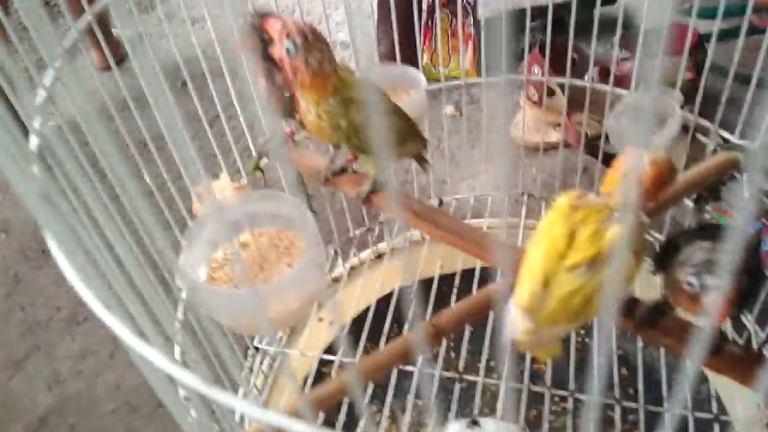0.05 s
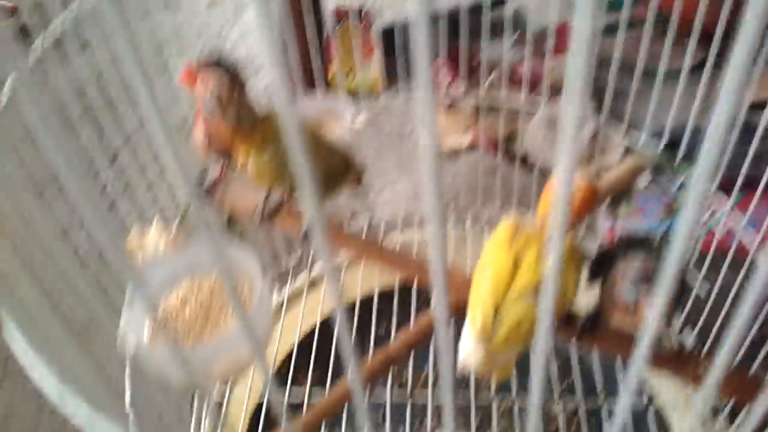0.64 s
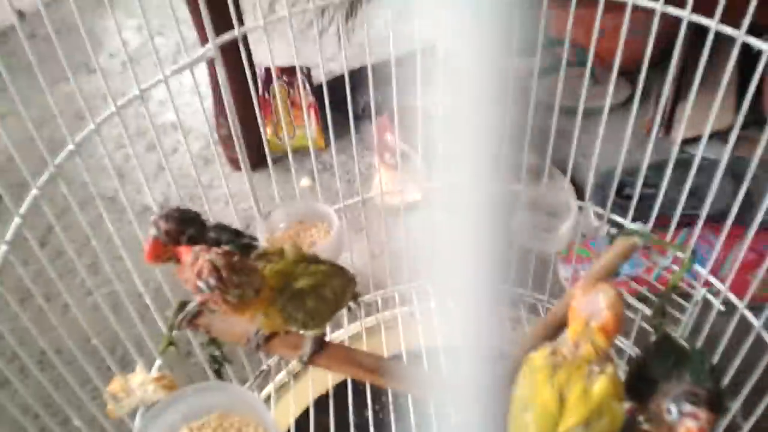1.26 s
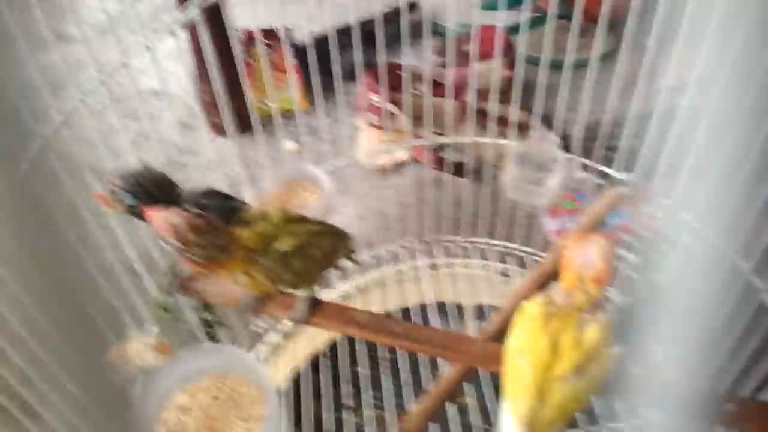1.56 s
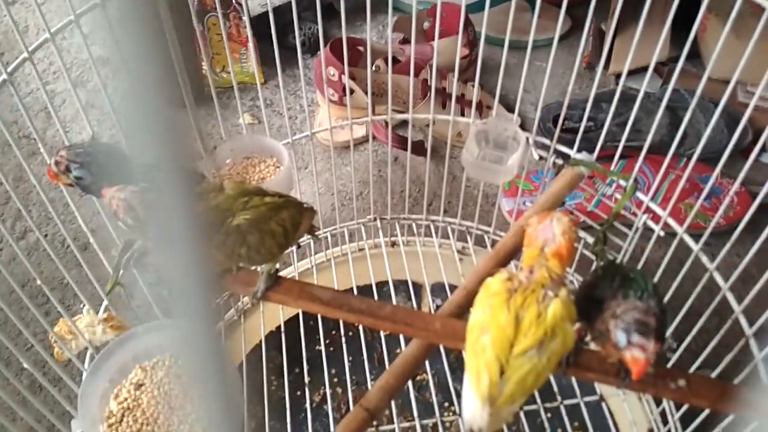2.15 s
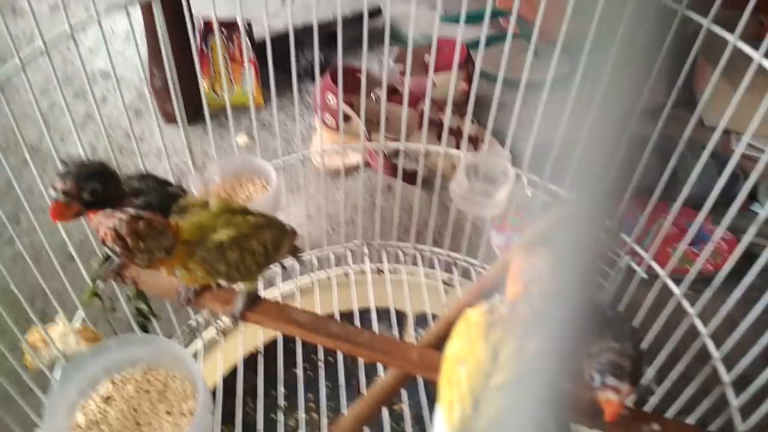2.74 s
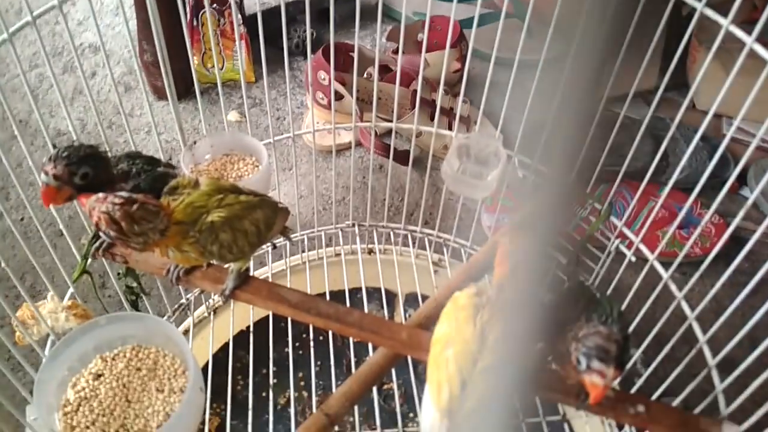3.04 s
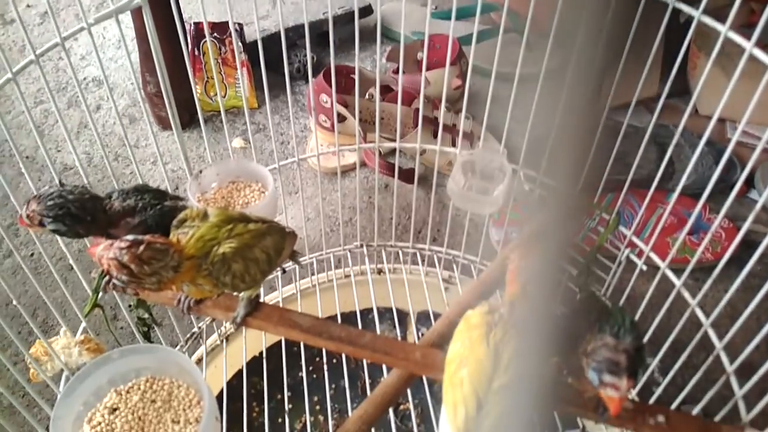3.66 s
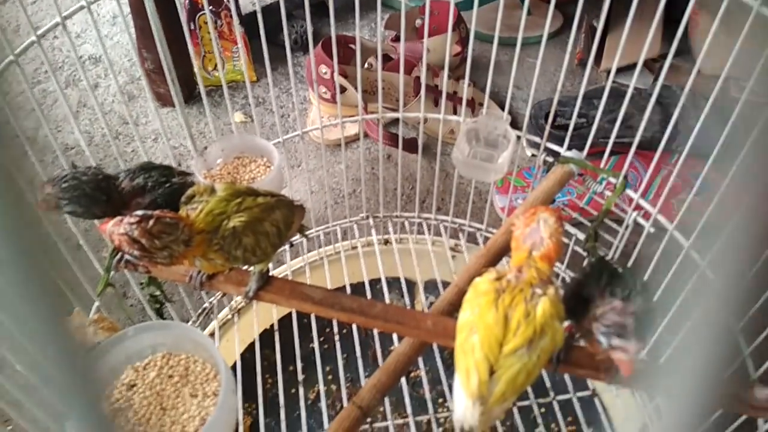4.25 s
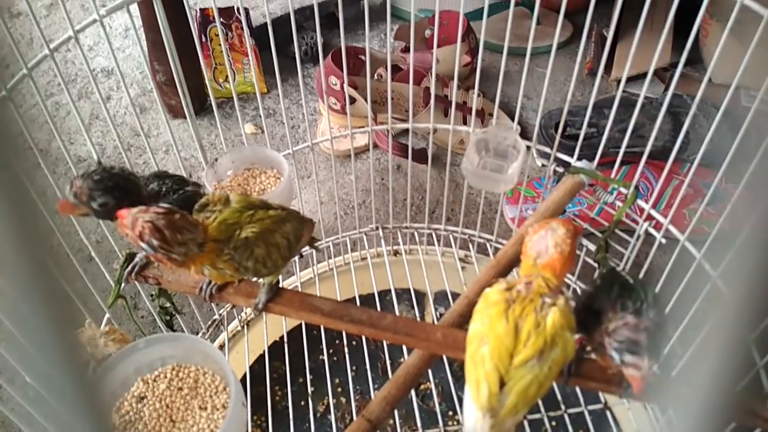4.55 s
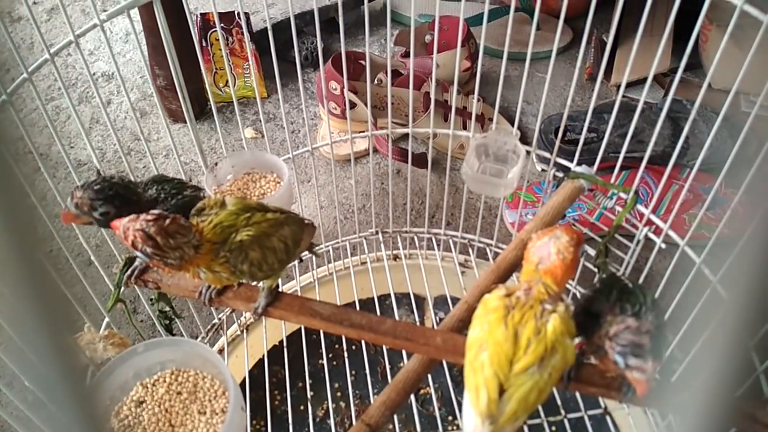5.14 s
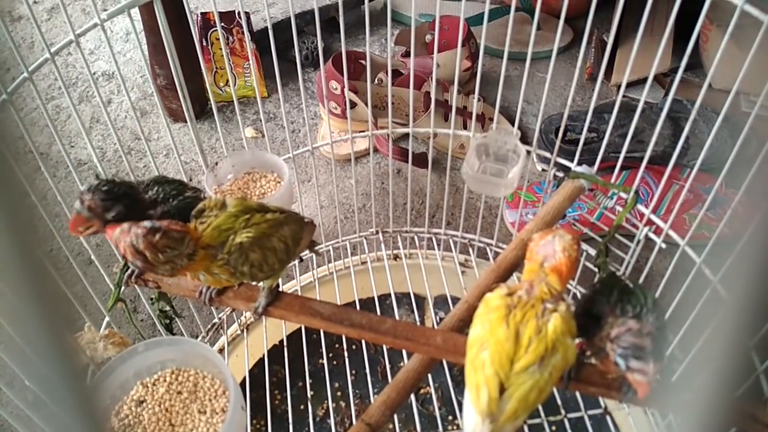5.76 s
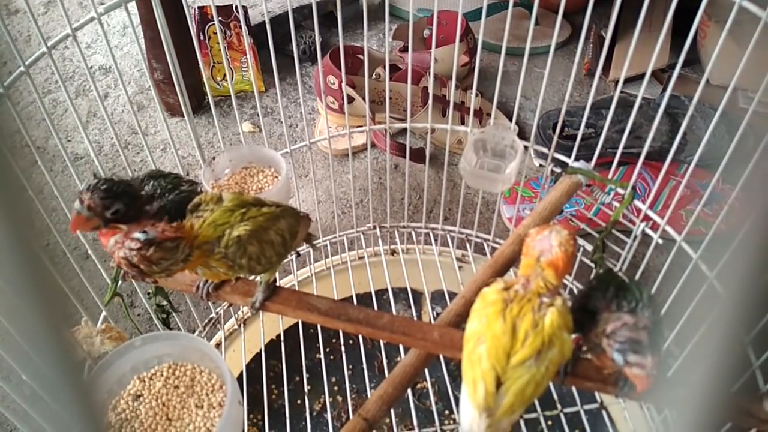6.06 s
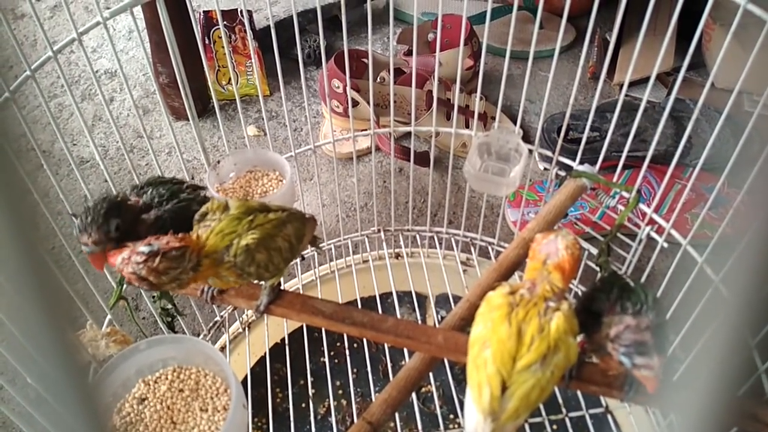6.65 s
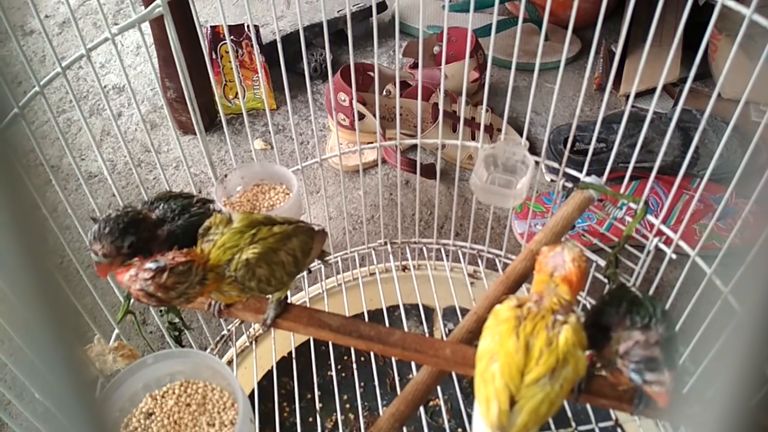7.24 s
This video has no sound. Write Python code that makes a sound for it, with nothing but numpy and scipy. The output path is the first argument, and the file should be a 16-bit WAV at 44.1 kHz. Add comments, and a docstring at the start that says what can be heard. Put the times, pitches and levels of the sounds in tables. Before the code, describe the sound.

Close, hand-held stereo sound of chicks begging indoors: harsh little buzzing rasps with squeaky chirps and breathy hisses slipped between them. Early on the calls turn to dry chuffs, then feathers flutter softly and the cage takes one knock. The rasping resumes in clusters with brief pauses and keeps on to the end, with an occasional tick on the wires. Underneath lie very faint distant bird calls and a low motor hum.

```python
"""Hoarse begging rasps, close up: lovebird chicks in a wire cage in a small room, in hand-held stereo.
Each rasp is a run of sharp syrinx clicks that speeds up into a buzz and rings in throat and beak.
Dry chuffs, thin hisses, gliding chirps and soft mutters slip in between the rasps.
The cage ticks and is bumped, feathers rustle, other birds call far off, and a motor throbs faintly."""
import sys
import numpy as np
from scipy import signal
from scipy.fft import rfft, irfft, next_fast_len
from scipy.io import wavfile
from scipy.ndimage import map_coordinates

SR = 44100
rng = np.random.default_rng(int(sys.argv[2]) if len(sys.argv) > 2 else 0)


def file_out(sig):
    """Save sig as 16-bit WAV at sys.argv[1]."""
    # one column per channel
    cols = np.atleast_2d(sig).T
    # limit, then scale
    lim = np.clip(cols, -1, 1)
    pcm = np.round(lim * 32767).astype(np.int16)
    wavfile.write(sys.argv[1], SR, pcm)


N = 330750
T = np.arange(N) / SR

# begging rasps: (start [s], end [s], level [dB], swell from first to second half [dB],
# buzz [Hz], throat [Hz], throat boost [dB], beak [Hz])
RASPS = [(0.075, 0.227, -36, 3, 971, 5370, 11.5, 9900), (0.292, 0.427, -36.5, -2.5, 920, 5120, 11, 9860),
         (1.353, 1.412, -30, -0.5, 906, 5310, 13, 9210), (1.417, 1.514, -39.5, -1.5, 948, 5020, 4, 10950),
         (1.499, 1.615, -32.5, 1, 885, 4800, 10, 7860), (1.687, 1.806, -33, -1, 894.6, 4500, 4, 9240),
         (2.325, 2.493, -34, 2.5, 905, 4340, 7.5, 9500), (2.551, 2.678, -32.5, -2.5, 890, 4630, 7.5, 9830),
         (2.688, 2.768, -42, 0.5, 827, 5340, -10.5, 10200.0),
         (2.748, 2.863, -30.5, -1.5, 919, 4900, 6, 10080), (3.288, 3.366, -33.5, -2.5, 947, 4920, 8, 8110),
         (3.377, 3.459, -40.5, 1.5, 908, 5240, 3, 10600), (3.453, 3.499, -31, -2, 920, 4900, -5.5, 10440),
         (3.632, 3.766, -38, -0.5, 931, 5500, -2, 10900), (4.452, 4.584, -33, 2, 915, 5430, 1.5, 9700),
         (4.655, 4.708, -32.5, -1, 873, 5460, 5.5, 10840), (4.715, 4.855, -34.5, 0, 942, 5730, 6, 10700),
         (5.473, 5.609, -31, -1, 965, 5500, 7.5, 9820), (5.636, 5.697, -43, -8, 865, 4540.0, 4.5, 10200),
         (5.688, 5.727, -31, 0.5, 934, 5330, 9.5, 10200),
         (5.735, 5.874, -31.5, 3.5, 999, 5760, 15.5, 10100),
         (5.927, 5.984, -32.5, -0.5, 875, 5250, 1.5, 10370),
         (6.106, 6.22, -35.5, 3, 856, 5020.0, 1.5, 10700),
         (6.247, 6.425, -31.5, 2.5, 903.5, 5760, 8.5, 11050),
         (6.488, 6.629, -30.5, 0, 909, 5510, 7.5, 9900), (6.703, 6.737, -33, 4.5, 1050, 5350, 4.5, 8960),
         (6.774, 6.869, -32.5, -1.5, 877, 5400, 7.5, 9300),
         (7.387, 7.503, -31.5, 2.5, 889, 5570, 8.5, 9540)]
# short dry chuffs, all slow clicks: (start [s], end [s], level [dB])
CHUFFS = [(.508, .545, -37), (.6, .637, -36.5), (.696, .73, -39), (.79, .836, -48), (.92, .95, -36.5),
          (.99, 1.04, -49), (1.088, 1.127, -30), (1.162, 1.206, -31), (1.281, 1.337, -32.5),
          (1.928, 1.963, -41.5), (2.222, 2.33, -51.5), (3.231, 3.29, -47), (4.428, 4.455, -47.5),
          (4.921, 4.979, -39), (5.402, 5.426, -38)]
# thin, almost voiceless hisses: (start [s], end [s], level [dB])
HISSES = [(.05, .12, -38), (.38, .518, -41.5), (1.21, 1.27, -46), (3.55, 3.636, -44), (3.77, 3.9, -43.5),
          (4.85, 5.015, -45), (5.127, 5.25, -56), (5.988, 6.036, -42), (7.323, 7.396, -40)]
# the voice of chuffs and hisses: (buzz [Hz], throat [Hz], throat boost [dB], beak [Hz])
SOFT_VOICE = (660, 7300, 0.93, 11500)
# the character of each kind of call:
# (chest boost [dB], beak boost [dB], beak width [Hz], attack [s], breath [dB], slow clicking [s])
RASP_SHAPE = (0.5, 4.2, 1700, .015, -4.3, .022)
CHUFF_SHAPE = (0.5, 9, 2600, .02, -4.5, .15)
HISS_SHAPE = (-12.5, 9, 2200, .05, 3, .005)
# a chick's tone colour before its resonances: (frequency [Hz], level [dB])
VOICE_COLOUR = [(300, -38.5), (560, -15), (880, -4), (1300, -5), (1850, -2.5), (3150, -1.5), (3800, -3.5),
                (5200, 0.5), (6600, -3.5), (7700, 1), (9000, -3.5), (11800, -2.5), (13200, -6),
                (15500, -19)]
# the two low resonances of a slack throat: (lower [Hz], upper [Hz])
CLUCK_HZ = [1370, 2300]
# clear chirps: (start [s], end [s], first pitch [Hz], middle pitch [Hz], last pitch [Hz],
# level [dB], brightness [dB per harmonic])
CHIRPS = [(.105, .229, 2560, 2830, 2720, -39, -2), (.545, .575, 3550, 3400, 2800, -45, -1),
          (1.238, 1.288, 3950, 3450, 3900, -44, 0), (1.238, 1.29, 3400, 2950, 3400, -46, -4),
          (2.505, 2.527, 3150, 3600, 3750, -45, 2), (2.527, 2.572, 3680, 3600, 3950, -39, 1),
          (3.325, 3.355, 3620, 3700, 3750, -37, 1), (3.507, 3.545, 3790, 4060, 4100, -34, -2),
          (3.762, 3.79, 3700, 3600, 3500, -42, 3), (3.785, 3.821, 3450, 3800, 3750, -38.5, 3),
          (3.865, 3.913, 4060, 4336, 3550, -43, 5), (4.593, 4.636, 3780, 4150, 4300, -34.5, -4),
          (4.777, 4.797, 4250, 4200, 3950, -39, 4), (4.853, 4.882, 3200, 3350, 4000, -39.5, -1),
          (4.884, 4.921, 3650, 3400, 4150, -40, 3), (4.975, 5.021, 4400, 4300, 3650, -40, 5),
          (5.426, 5.469, 2850, 2400, 2750, -34.5, -0.5), (5.612, 5.649, 3350, 3700, 4450, -36, -1),
          (5.872, 5.901, 4150, 4370, 4550, -32, -6), (6.227, 6.251, 4140, 3950, 3450, -41, 5),
          (6.417, 6.469, 4025, 3670, 2605, -40.5, 3), (6.626, 6.648, 4080, 4180, 4100, -35.5, -1),
          (7.419, 7.449, 4280, 4040, 3550, -42, 2)]
# harmonics 1-5 of a chirp: (level [dB])
CHIRP_HARMONICS = [-2, -0.5, -3, -3.5, -17]
# soft wavering mutters: (start [s], end [s], level [dB])
MUTTERS = [(0, 0.043, -45.5), (1, 1.102, -59), (1.167, 1.234, -42.5), (1.283, 1.331, -38.5),
           (2.236, 2.32, -54.5), (3.544, 3.63, -51.5), (7.298, 7.345, -52)]
# hits on the cage: (time [s], wire tick [dB], tray knock [dB])
CAGE_HITS = [(0.932, -38, -80), (0.944, -44, -53.5), (1.333, -26, -32), (1.3459, -24.5, -39),
             (1.352, -26, -52.5), (1.932, -41.5, -52.5), (1.947, -33, -53.5), (3.0312, -48, -33.5),
             (3.461, -36.5, -79.5), (6.098, -43.5, -80), (7.289, -40, -63)]
# the colour of a wire tick: (frequency [Hz], level [dB])
WIRE_COLOUR = [(400, -23), (1500, -3.5), (4000, -16), (7000, -9), (11500, -4.5), (15500, -12)]
# modes of the plastic tray: (frequency [Hz], level [dB], t60 [s])
TRAY_MODES = [(233, -13, 0.098), (340, -5, 0.033), (470, 6.5, 0.0055), (935, -10, 0.0033),
              (1460, -11, .015), (2230, -6.5, 0.027)]
# the hand jolts against the bars: (time [s], level [dB])
BUMP_ENVELOPE = [(1.325, -69.5), (1.338, -37), (1.375, -39.5), (1.40, -47), (1.45, -73)]
# a chick flutters and shuffles on the perch: (start [s], end [s], level [dB])
RUSTLES = [(0.957, 1.616, -49), (1.94, 2.024, -49)]
# the colour of brushing feathers: (frequency [Hz], level [dB])
FEATHER_COLOUR = [(400, -16), (1500, -13.5), (5000, -7), (11000, -1.5), (15500, 0)]
# distant birds: (start [s], end [s], first pitch [Hz], middle pitch [Hz], last pitch [Hz],
# fundamental [dB], second harmonic [dB])
FAR_CALLS = [(3.983, 4.13, 737, 871, 874, -67, -71), (4.282, 4.486, 777, 764, 773, -65.5, -66),
             (4.963, 5.417, 1535, 1480, 1376, -75, -101), (7.099, 7.125, 4120, 5090, 5320, -49.5, -60.5)]
# the still room: (frequency [Hz], level [dB])
ROOM_TONE = [(25, -6.5), (70, -2.5), (190, -5), (330, -22), (1000, -34), (3400, -41.5), (7000, -35.5),
             (10000, -31), (13000, -39.5), (15500, -42)]
# the room's decay: (frequency [Hz], t60 [s])
ROOM_DECAY = [(200, 0.39), (1000, 0.26), (3200, 0.33), (5000, 0.37), (10000, 0.38), (15000, 0.6)]
# sound bends round the microphone to its left port:
# (frequency [Hz], phase lag before the hand turns [rad], phase lag after [rad])
LEFT_LAG = [(100, 0, 0), (500, .3, .5), (1000, .7, 1.3), (1750, 2.3, 3.05), (2250, 3.1, 3.2), (2700, 5, 6),
            (3550, 7.5, 9.2), (3900, 8.9, 9.5), (4900, 11.8, 12.6), (5900, 13, 15.4), (6400, 13.5, 15.9),
            (7400, 15.2, 17.2), (8800, 16.3, 18.5), (10800, 18.4, 22.3), (12000, 19.8, 25.4),
            (16000, 24.4, 34.5)]
# the hand turns the left port away: (time [s], share of the turn [0-1])
HAND_TURN = [(1.8, 0), (2.2, 1)]
# shading between the ports: (frequency [Hz], left minus right [dB])
STEREO_SHADE = [(500, -1), (1900, 6), (2500, 6), (4400, -0.5), (6000, -0.5), (8000, -3.5), (9100, -7),
                (11000, -11.5), (15000, 6.5)]

FULL_EFFORT_DB, CHEST_PER_DB, BEAK_PER_DB = -33.5, .32, .45  # softer calls: more chest, less beak
BUZZ_CLIMB, THROAT_CLIMB = .11, .066  # shares by which buzz and throat resonance rise over a call
CREAK_HZ, CREAK_SCATTER = 430, .26  # slow clicks of a slack syrinx: rate, unevenness of spacing


def rasp(length, level_db, swell_db, voice, shape, drift=.036, jitter=.044):
    """Slow, uneven syrinx clicks speed up into a buzz; clicks and breath ring in throat and beak."""
    buzz_hz, throat_hz, throat_db, beak_hz = voice
    chest_db, beak_db, beak_width_hz, rise_s, breath_db, creak_s = shape
    softness_db = FULL_EFFORT_DB - level_db
    t = np.arange(int((length + .0072) * SR)) / SR
    progress = np.minimum(t / length, 1)
    # every call tightens and climbs at its own pace, and now and then turns hoarse again
    creak = bell(t, 0, creak_s * np.exp(rng.normal() / 4))
    hoarse = np.maximum(creak, np.clip(wobble(t, 35) - .6, 0, 1) / 2)
    climb = BUZZ_CLIMB * (1 + rng.normal() / 2) * (progress - .5)
    waver = drift * wobble(t, 45) + jitter * np.exp(wobble(t, 35) / 2) * wobble(t, 1000)
    waver += CREAK_SCATTER * hoarse * wobble(t, 500)
    pitch = buzz_hz * (CREAK_HZ / buzz_hz) ** creak * np.exp(climb + waver)
    puffs = np.exp(.9 * np.cos(phase_of(pitch))) * rng.standard_normal(len(t))  # the buzz chops the air
    breath = unit(filtered(puffs, lambda f: f / np.hypot(f, 1800)))
    source = clicks(pitch, spread_db=1.6 + 1.2 * hoarse) + amp(breath_db) * breath
    gape = np.exp(rng.normal() / 10)

    def tract(stretch, slack):
        """Chest, throat, nose and beak colour the source; a slack throat adds a low cluck."""
        def colour_db(f):
            chest = (chest_db + CHEST_PER_DB * softness_db) * bell(f, 1900, 1200)
            cluck = slack * 9.5 * sum(bell(f, hz * gape, 330) for hz in CLUCK_HZ)
            throat = (1 - slack / 2) * throat_db * bell(f, throat_hz * stretch, 600)
            nasal = 2 * bell(f, throat_hz * stretch / 2, 300)
            beak = (beak_db - BEAK_PER_DB * softness_db) * bell(f, beak_hz, beak_width_hz)
            ripple = 3 * wobble(f, 1 / 450)  # changes as the head turns
            return along(VOICE_COLOUR, f) + chest + cluck + throat + nasal + beak + ripple
        return unit(resonate(source, colour_db))

    early = tract(1 - THROAT_CLIMB / 2, slack=0)
    late = tract(1 + THROAT_CLIMB / 2, slack=0)
    taut = (1 - progress) * early + progress * late
    call = (1 - hoarse) * taut + hoarse * tract(1 - THROAT_CLIMB, slack=1)
    flicker = amp(.9 * wobble(t, 72.4))
    gain = amp(level_db + swell_db * np.clip(2 * progress - 1, -.5, .5))
    return unit(call * flicker) * gain * gate(t, length + .0046, rise_s, fall=.027)  # the beak shuts


def clicks(rate_hz, spread_db):
    """The syrinx snaps once a cycle, each click its own size; slower clicks are stronger."""
    cycles = np.cumsum(rate_hz) / SR
    nearest = np.round(cycles).astype(int)
    offset_samples = (cycles - nearest) * SR / rate_hz
    sizes = amp(spread_db * np.clip(rng.standard_normal(len(cycles)), -2, 2)[nearest]) / np.sqrt(rate_hz)
    return unit(sizes * np.sinc(.8 * offset_samples) * bell(offset_samples, 0, 6))


def harsh_calls():
    """One clicking voice, played as rasp, chuff or hiss."""
    out = np.zeros(N)
    for start, end, level_db, swell_db, *voice in RASPS:
        add(out, start - .002, rasp(end - start, level_db, swell_db, voice, RASP_SHAPE))
    for calls, shape in (CHUFFS, CHUFF_SHAPE), (HISSES, HISS_SHAPE):
        for start, end, level_db in calls:
            add(out, start - .004, rasp(end - start, level_db, 0, SOFT_VOICE, shape))
    return out


def chirp(length, pitches, level_db, tilt_db, waver, breath_db, buzz_hz=900, top_hz=13000):
    """The syrinx runs almost cleanly: a gliding whistle, fringed with breath."""
    t = np.arange(int((length + .0044) * SR)) / SR
    hook = 1 - .08 * np.exp(np.minimum((t - length) / .004, .5))  # pressure drops, the pitch hooks down
    quaver = 1 + waver * wobble(t, 60) + .009 * wobble(t, 170) + .015 * wobble(t, 2000)
    pitch = glide(t, length, pitches) * hook * quaver
    tone = np.zeros(len(t))
    for k, db in enumerate(CHIRP_HARMONICS, 1):
        shimmer_db = 2 * wobble(t, 206)
        rolloff = bell((k * pitch / top_hz) ** 4, 0, 1.3)
        tone += amp(db + tilt_db * k + shimmer_db) * rolloff * np.sin(k * phase_of(pitch))
    hoarse = np.interp(length, [.05, .09], [.16, .55])  # the buzz creeps into longer chirps
    buzz = np.exp(hoarse * np.cos(phase_of(buzz_hz * (1 + wobble(t, 600) / 10))))
    breath = amp(breath_db) * unit(noise(len(t), VOICE_COLOUR))
    return amp(level_db) * (unit(tone * buzz) + breath) * gate(t, length, rise=.0023, fall=.012)


def whistled_calls(mutter_hz=3620):
    """Clear chirps, and breathier mutters that wander round one pitch."""
    out = np.zeros(N)
    for start, end, *pitches, level_db, tilt_db in CHIRPS:
        add(out, start, chirp(end - start, pitches, level_db, tilt_db, waver=.01, breath_db=-18.5))
    for start, end, level_db in MUTTERS:
        mutter = chirp(end - start, [mutter_hz] * 3, level_db, tilt_db=1, waver=.061, breath_db=-5.5)
        add(out, start, mutter)
    return out


def cage(tick_t60=.024):
    """Claws, beaks and the hand tick on the wires; heavier hits knock the tray too."""
    out = np.zeros(N)
    t = np.arange(SR // 8) / SR
    for start, wire_db, tray_db in CAGE_HITS:
        tick = unit(noise(len(t), WIRE_COLOUR)) * amp(-60 * t / tick_t60)
        knock = sum(amp(db + 2 * rng.normal() - 60 * t / t60) * np.cos(2 * np.pi * hz * t)
                    for hz, db, t60 in TRAY_MODES)
        add(out, start, amp(wire_db) * tick + amp(tray_db - 2.5) * knock)
    return out


def bump():
    """A dull thump carried through the hand, different at each port."""
    thud = unit(noise((2, N), colour=[(65, 0), (130, -11.5), (300, -18.5), (3000, -90.5)]))
    return thud * amp(np.interp(T, *np.transpose(BUMP_ENVELOPE)))


def rustles(grain_db=3, grain_hz=130):
    """Feathers brush each other and the wires in a fine, grainy hiss."""
    out = np.zeros(N)
    for start, end, level_db in RUSTLES:
        length = end - start
        t = np.arange(int((length + .05) * SR)) / SR
        hiss = noise(len(t), FEATHER_COLOUR) * amp(grain_db * wobble(t, grain_hz))
        add(out, start, amp(level_db) * unit(hiss) * gate(t, length, rise=.01, fall=.053))
    return out


def far_calls():
    """Birds some way off: faint, wavering glides of two harmonics."""
    out = np.zeros(N)
    for start, end, *pitches, fundamental_db, second_db in FAR_CALLS:
        length = end - start
        t = np.arange(int((length + .02) * SR)) / SR
        phase = phase_of(glide(t, length, pitches) * (1 + .037 * wobble(t, 150)))
        tone = amp(fundamental_db) * np.sin(phase) + amp(second_db) * np.sin(2 * phase)
        add(out, start, tone * gate(t, length, rise=length / 4, fall=.011))
    return out


def room_tone(level_db=-66):
    """Low rumble and faint air, half shared between the ports."""
    air = noise((3, N), ROOM_TONE)
    return amp(level_db) * unit(air[0] + air[1:])


def motor(stroke_hz=17.05, throb_db=-68, hum_db=-69):
    """Each stroke gives a short low boom, over a hum at four times the stroke rate."""
    turns = np.cumsum(stroke_hz * (1 + .00395 * wobble(T, 1.5))) / SR
    strokes = np.diff(np.floor(turns), prepend=0) * amp(4.9 * wobble(T, 6.8))
    throb = unit(filtered(strokes, lambda f: bell(f, 175, 70)))
    hum = amp(2 * wobble(T, 3)) * np.sin(4 * 2 * np.pi * turns)
    return amp(throb_db) * throb + amp(hum_db) * hum


def left_port(x, before_db=-2, after_db=-3):
    """The way round the microphone to the left port grows longer as the hand turns."""
    hz, lag_before, lag_after = np.transpose(LEFT_LAG)
    before = filtered(x, lambda f: np.exp(-1j * np.interp(f, hz, lag_before)))
    after = filtered(x, lambda f: np.exp(-1j * np.interp(f, hz, lag_after)))
    turn = np.interp(T, *np.transpose(HAND_TURN))
    return (1 - turn) * amp(before_db) * before + turn * amp(after_db) * after


def near_echoes(x, sway_s=.00006, above_hz=2900, count=6):
    """Tray, cups and bars bounce only treble to each port; the paths sway with the hand."""
    treble = filtered(x, lambda f: 1 - bell(f * f, 0, above_hz ** 2))
    out = np.zeros((2, N))
    for port, delays_s in enumerate(rng.uniform(.000466, .004, (2, count))):
        for delay_s in delays_s:
            swaying_s = delay_s + sway_s * wobble(T[::64], 2).repeat(64)[:N]
            out[port] += map_coordinates(treble, [np.arange(N) - SR * swaying_s], order=3)
    return out / np.sqrt(count)


def reverb(x):
    """The small room's diffuse tail at each port; every frequency dies at its own speed."""
    hz, t, spectra = signal.stft(rng.standard_normal((2, int(SR * .75))), SR, nperseg=256)
    decay = amp(-60 * t / along(ROOM_DECAY, hz)[:, None])
    tail = signal.istft(spectra * decay, SR, nperseg=256)[1]
    return signal.fftconvolve(x[None], tail / np.linalg.norm(tail[0]), axes=1)[:, :N]


def amp(db):
    """Decibels to gain."""
    return 10 ** (np.asarray(db) / 20)


def unit(x):
    """Scale to rms 1."""
    return x / np.sqrt(np.mean(x ** 2) + 1e-20)


def along(points, hz):
    """Read (frequency [Hz], value) points on a log axis."""
    knots_hz, values = np.transpose(points)
    return np.interp(np.log(hz + 1), np.log(knots_hz), values)


def bell(x, centre, width):
    """A rounded hump of height 1."""
    return np.exp(-((x - centre) / width) ** 2)


def wobble(t, rate):
    """A smooth random curve with rate knots per unit of t."""
    return map_coordinates(rng.standard_normal(int(t[-1] * rate) + 4), [t * rate], mode="nearest")


def phase_of(hz):
    """Running phase of a moving pitch, in radians."""
    return 2 * np.pi * np.cumsum(hz) / SR


def glide(t, length, pitches):
    """Pitch along an arch through its first, middle and last value."""
    return np.polyval(np.polyfit([0, .5, 1], pitches, 2), np.minimum(t / length, 1))


def gate(t, length, rise, fall):
    """Swells over rise seconds, holds, and closes over fall seconds around length."""
    return np.sin(np.pi / 2 * np.clip(t / rise, 0, 1)) ** 2 * np.clip((length - t) / fall + .5, 0, 1)


def filtered(x, response):
    """Play x through a frequency response."""
    n = x.shape[-1]
    padded = next_fast_len(n + 4096)
    return irfft(rfft(x, padded) * response(np.fft.rfftfreq(padded, 1 / SR)), padded)[..., :n]


def noise(shape, colour):
    """Noise shaped by (frequency [Hz], level [dB]) points."""
    return filtered(rng.standard_normal(shape), lambda f: amp(along(colour, f)))


def resonate(x, colour_db):
    """Ring x through a colour at minimum phase, so nothing sounds ahead of a click."""
    half = next_fast_len(len(x) // 2 + 1024)
    cepstrum = irfft(np.log(amp(colour_db(np.fft.rfftfreq(2 * half, 1 / SR)))))
    cepstrum[1:half] *= 2
    cepstrum[half + 1:] = 0
    return irfft(rfft(x, 2 * half) * np.exp(rfft(cepstrum)))[:len(x)]


def add(track, start, sound):
    """Mix a sound into a track at start seconds."""
    i = max(round(start * SR), 0)
    track[i:i + len(sound)] += sound[:max(N - i, 0)]


def scene(whistle_db=3, reverb_db=-16, echo_left_db=-3, echo_right_db=-9, far_direct=.46):
    """The chicks face the right port, crisp; the left hears them later, shaded and among more echoes."""
    birds = harsh_calls() + amp(whistle_db) * whistled_calls()
    movement = cage() + rustles()
    far = far_calls()
    direct = np.array([left_port(birds), birds]) + movement
    echoes = amp([[echo_left_db], [echo_right_db]]) * near_echoes(birds + movement)
    tail = amp(reverb_db) * reverb(birds + movement)
    mix = direct + echoes + tail + far_direct * far + reverb(far)
    shaded = filtered(mix, lambda f: amp(np.outer([.5, -.5], along(STEREO_SHADE, f))))
    return shaded + room_tone() + motor() + bump()


def record(dry, top_hz=16000):
    """A brick-wall cut takes off the very top."""
    return filtered(dry, lambda f: f < top_hz)


dry = scene()
out = record(dry)
file_out(out)
```